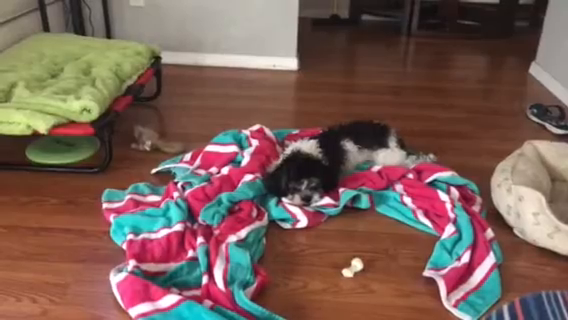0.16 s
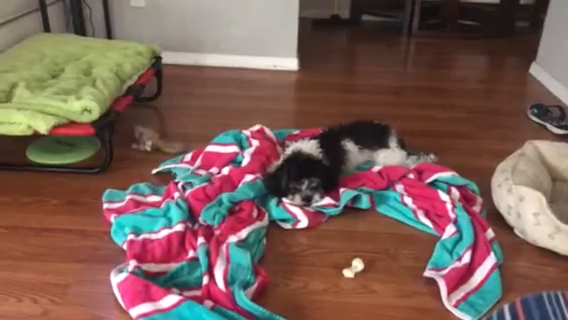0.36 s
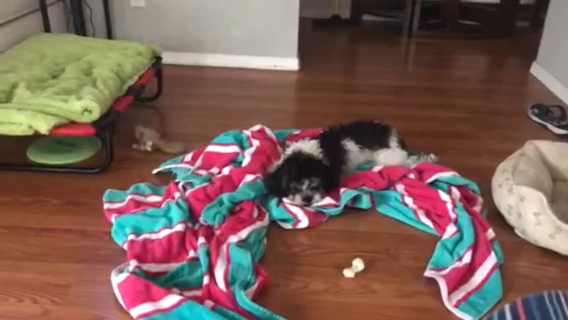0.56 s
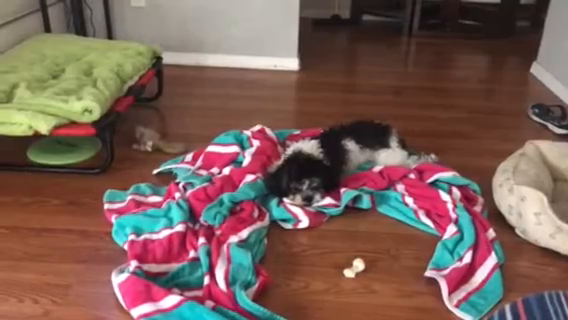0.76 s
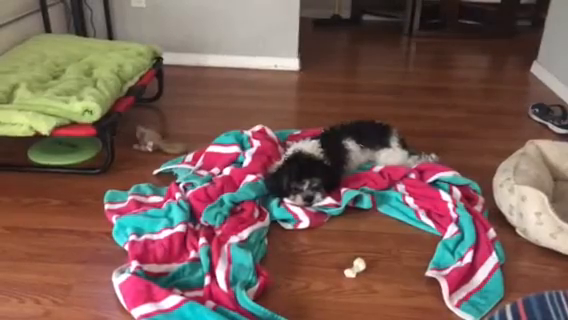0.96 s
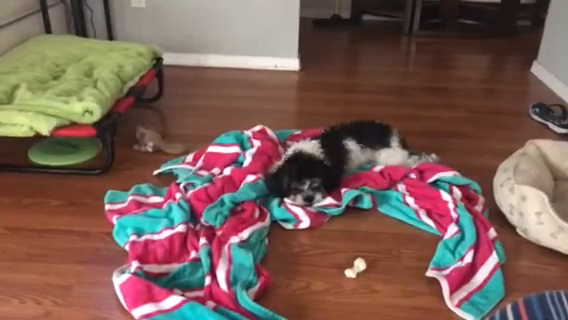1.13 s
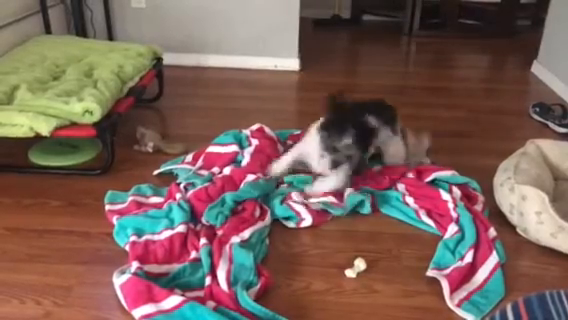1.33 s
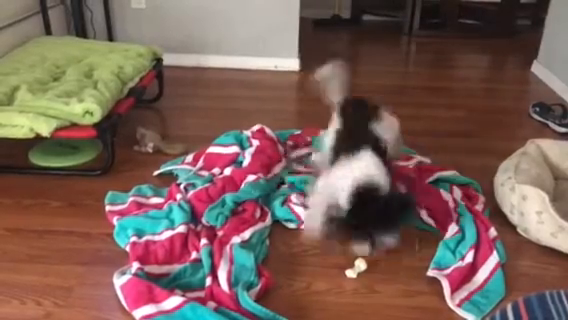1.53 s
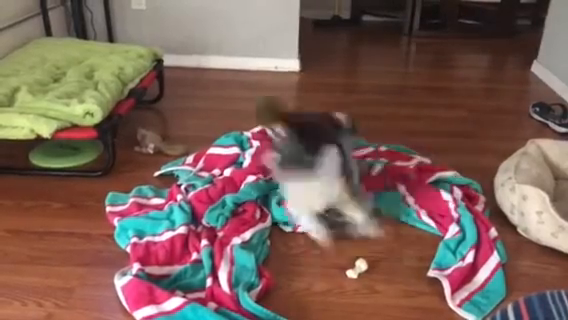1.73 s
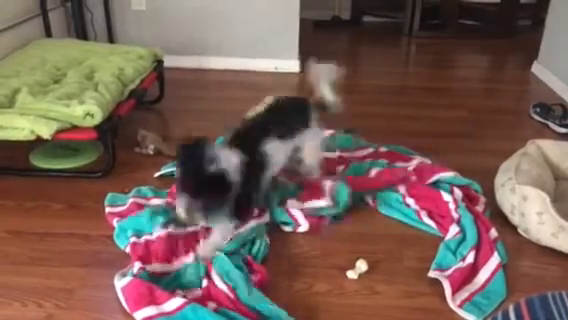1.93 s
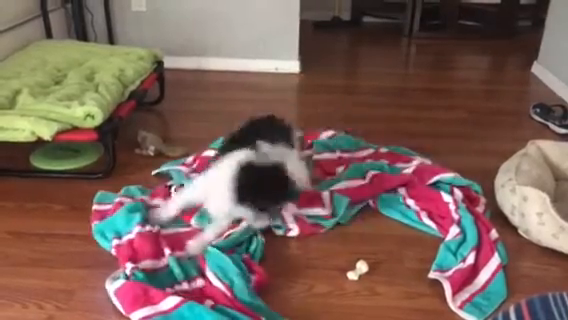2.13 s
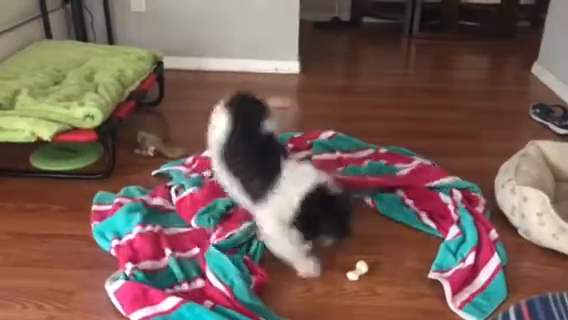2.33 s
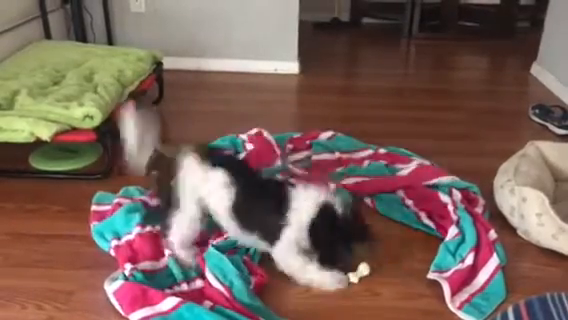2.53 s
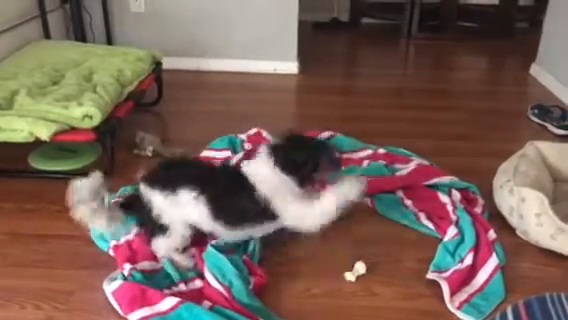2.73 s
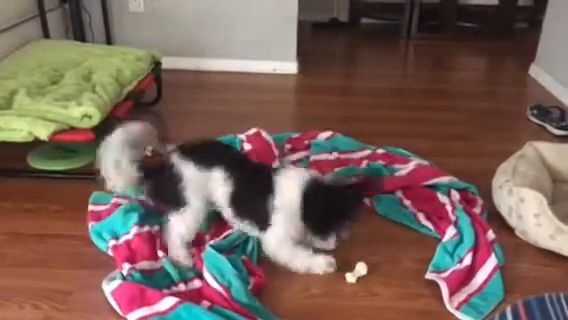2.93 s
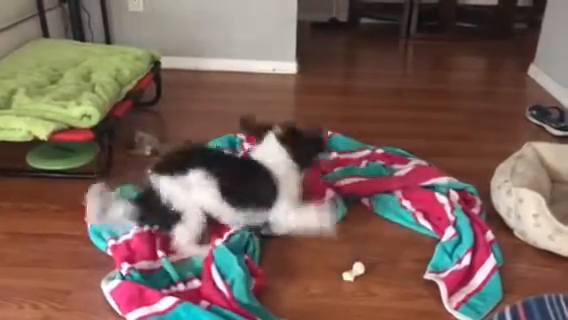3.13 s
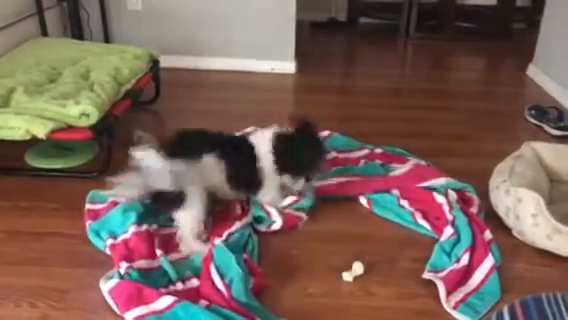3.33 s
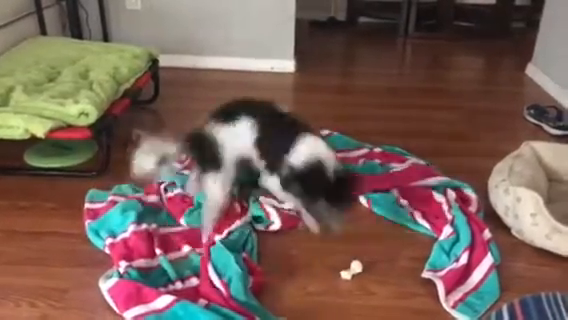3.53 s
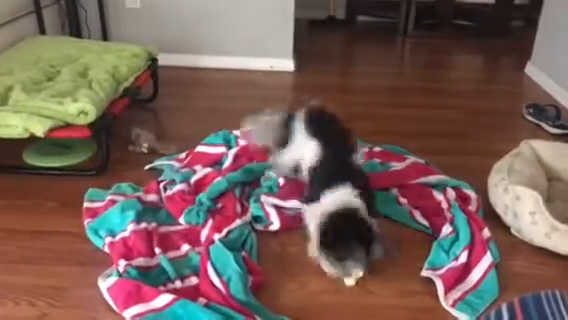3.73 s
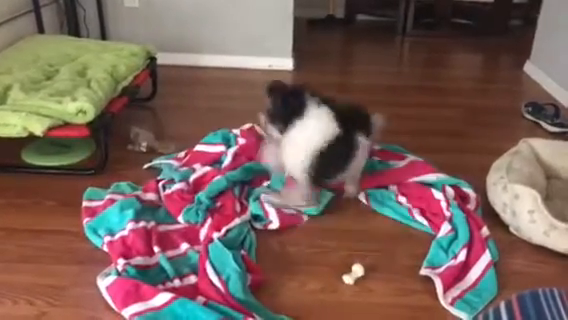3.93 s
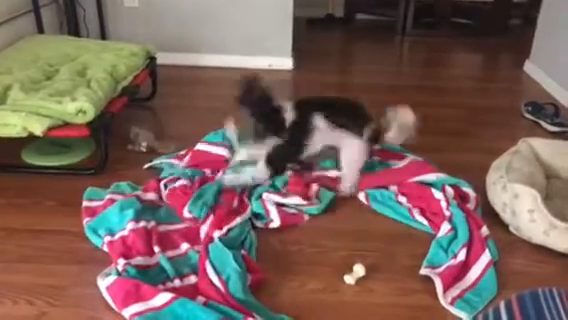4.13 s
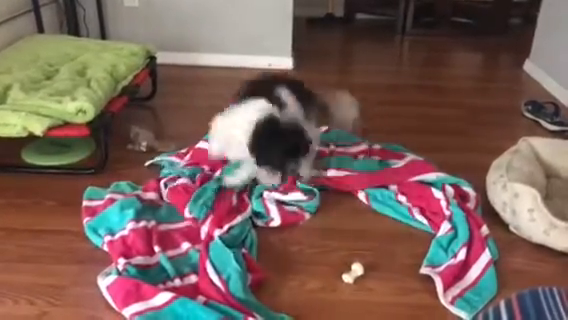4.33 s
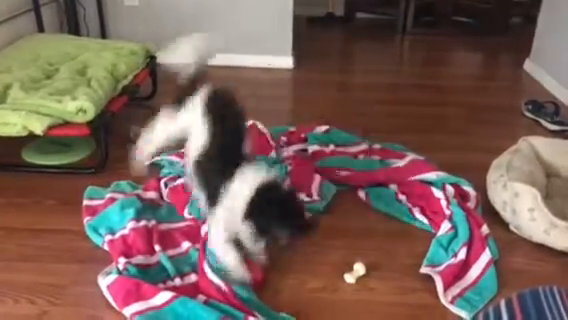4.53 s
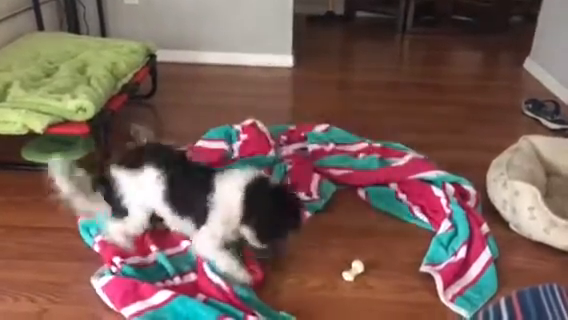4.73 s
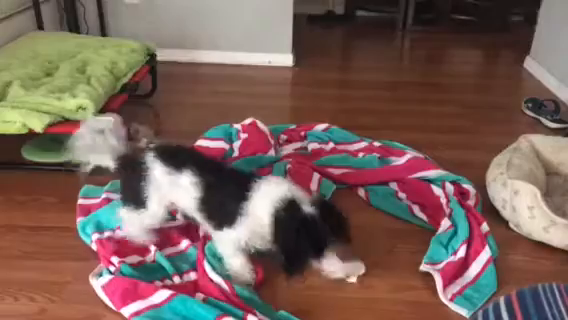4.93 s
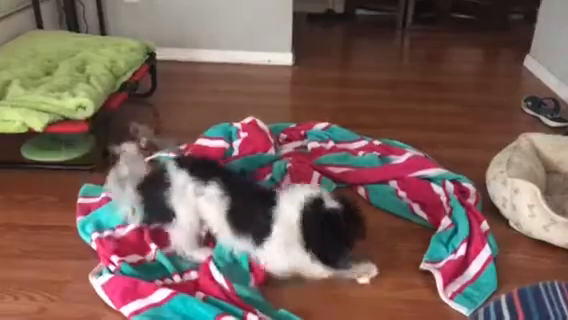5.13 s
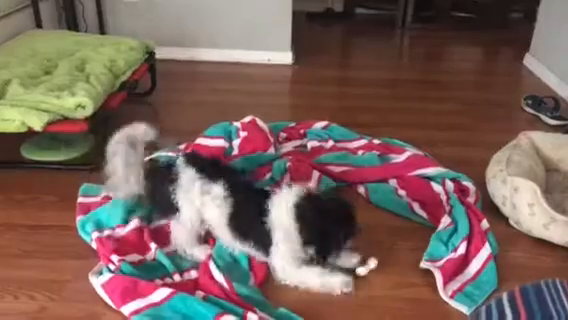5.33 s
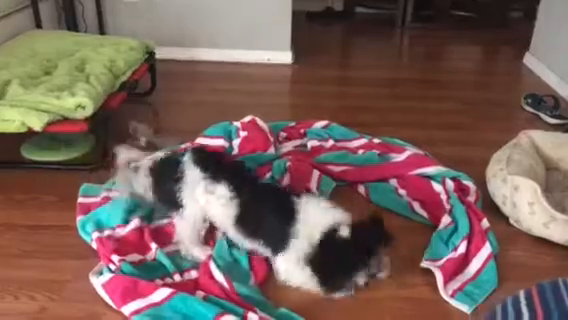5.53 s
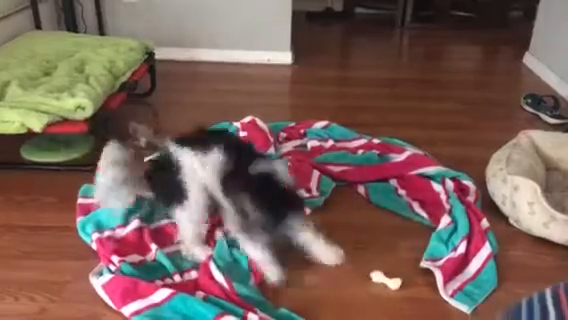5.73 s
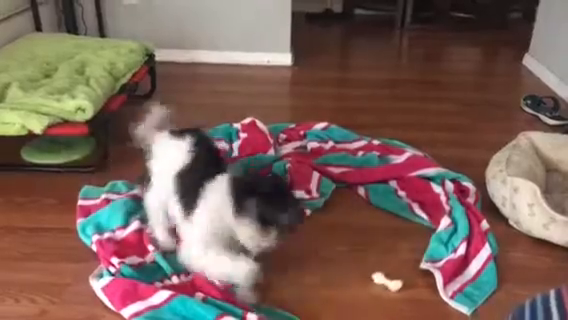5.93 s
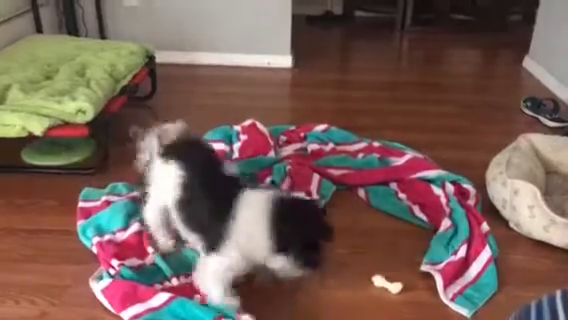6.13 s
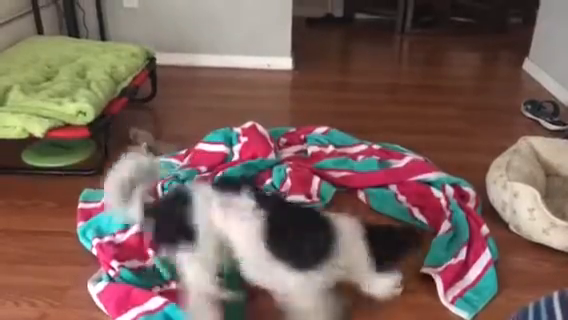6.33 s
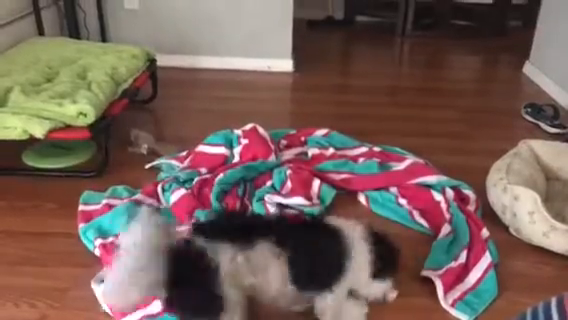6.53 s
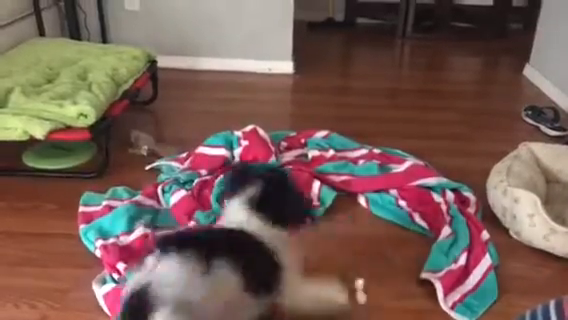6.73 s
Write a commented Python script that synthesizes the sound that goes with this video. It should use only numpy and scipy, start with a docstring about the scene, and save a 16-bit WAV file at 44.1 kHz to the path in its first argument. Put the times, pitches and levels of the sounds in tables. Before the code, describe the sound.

After a quiet start, a brief playful dog growl, then bursts of sharp claw clacks, dull paw knocks and snorts, an engine drone swelling faintly behind.

```python
"""In a room with a wooden floor, a small dog growls once, then a click, snorts and pouncing on a spread towel.
Voice and breath are pulses and noise filtered by resonances, the click a very short burst of the same kind.
Claws are noise cracks, paw blows ring decaying board modes, cloth is grainy noise,
and sparse reflections form the room's brief ring.
Behind lie air hiss, a low hum, room rumble and a drone that swells, as from an engine outdoors."""
import sys
import numpy as np
from scipy import signal
from scipy.fft import rfft, irfft
from scipy.io import wavfile
from scipy.ndimage import uniform_filter1d

SR = 44100
rng = np.random.default_rng(int(sys.argv[2]) if len(sys.argv) > 2 else 0)


def output_pcm(signal):
    """Save a mono or channel-first signal as 16-bit PCM at the path in sys.argv[1].

    Samples are clipped to [-1, 1] before scaling.
    """
    pcm = np.clip(np.atleast_2d(signal).T, -1, 1) * 32767
    wavfile.write(sys.argv[1], SR, np.round(pcm).astype(np.int16))


N = 303408

# air hiss spectrum: pitch_hz, density_db (per Hz, relative)
AIR_SPECTRUM = [(15, -45.5), (25, -16.5), (42, -13.5), (65, -4.5), (87, -23.5), (114, 0.5), (232, -11.5),
                (313, -10), (368, -17), (634, -23), (952, -23), (2900, -36), (15700, -44), (16200, -62)]
# room modes fed by rumble: pitch_hz, width_hz, level_db
RUMBLE_MODES = [(47.5, 8.7, -66), (122.4, 3.4, -74.5), (146, 2.6, -74.5), (183, 4.8, -67.5),
                (226.3, 9.9, -62.5), (361.8, 2.8, -69.5), (430, 30, -73.5)]
# drone course: start_s, pitch_hz, level_db
DRONE_COURSE = [(3.3, 126, -63.5), (3.6, 123, -62.5), (4.19, 122, -59), (4.5, 130.7, -53.5),
                (5.24, 131.3, -54), (5.61, 130.5, -46.5), (5.92, 133.9, -44.5), (6.12, 134.5, -45.5),
                (6.4, 134.5, -39.5), (6.57, 137.5, -47), (6.88, 132.6, -39)]
# growl course: start_s, effort_db, pitch_hz, mouth_db (on the upper resonances),
# shift (factor on their pitch), breath_db (re effort)
GROWL_COURSE = [(1.303, -35, 330.1, -9, 1.13, -36), (1.32, -61, 310.7, -3, 0.81, -24),
                (1.328, -56, 296, 2, 1.7, -19), (1.338, -35.5, 297.6, 3, 0.91, -28),
                (1.375, -37.5, 255.3, 2, 1.05, -22), (1.42, -42.5, 288.1, 2.5, 0.97, -20),
                (1.49, -27, 255.3, -3.5, 1.14, -27), (1.515, -41, 157.1, 3, 1.185, -18.5),
                (1.63, -40.5, 157.5, 2, 0.93, -24), (1.7, -49, 150, 7, 0.94, -21),
                (1.79, -72, 146, -6, 1.4, -23)]
# throat resonances: pitch_hz, width_hz, level_db; the first two stay when the mouth shuts
THROAT_RESONANCES = [(150, 59, 5), (295, 247, -5.5), (587, 235, -8), (973, 140, -7), (1423, 420, -13.5),
                     (1980, 410, -38)]
# nose resonances of the growl's breath: pitch_hz, width_hz, level_db
NOSE_RESONANCES = [(3520, 500, 0), (7470, 1500, 8.5), (8940, 1400, 9), (11000, 1400, 5.5),
                   (13900, 2600, 2.5)]
# decay of the room: pitch_hz, t60_s
ROOM_DECAY = [(300, 0.46), (1000, 0.36), (3000, 0.48), (6000, 0.46), (12000, 0.33)]
# towel and fur rubbing while the dog is on the move: start_s, scuff_db
RUB_COURSE = [(1.6, -58), (1.7, -40.5), (1.85, -64), (2.33, -73), (3.39, -73.5), (3.61, -74.5), (3.76, -64),
              (5.07, -76.5), (5.67, -72), (5.83, -53), (6.0, -71), (6.61, -74), (6.78, -56), (6.88, -61)]
# dull scuff resonances: pitch_hz, width_hz, level_db
SCUFF_RESONANCES = [(1240, 1300, -4.5), (1810, 760, 0), (3950, 1800, -15)]
# fizz spectrum of cloth and of the hiss in click and snorts: pitch_hz, density_db (per Hz, relative)
FIZZ_SPECTRUM = [(710, -35), (1200, -1.5), (2530, -11.5), (4620, -15.5), (11700, -15), (14600, -17.5),
                 (16000, -29), (16500, -24)]
# towel swishes: start_s, level_db, length_s, hum_db (boards under the drag, re level)
SWISH_EVENTS = [(1.703, -55.5, 0.031, 17), (1.894, -63, .12, -37), (2.515, -56.5, 0.048, 3),
                (2.64, -51, 0.12, -24), (3.082, -59.5, 0.24, -2.5), (3.842, -45.5, 0.096, -2.5),
                (5.332, -49.5, 0.031, -24), (5.373, -80, 0.11, 27), (5.648, -67, 0.15, 11.5),
                (5.785, -69, 0.18, 19), (6.209, -51.5, 0.1, -5.5), (6.325, -63, 0.054, -6),
                (6.768, -57.5, 0.052, 16)]
# claw strikes: start_s, level_db, brightest_hz, room_db (sent to the room, re level)
CLAW_STRIKES = [(1.6147, -21, 6500, 7), (1.6772, -20, 6160, 6.5), (1.731, -29, 7140, 5),
                (1.8237, -38.5, 6150, 6.5), (2.4593, -18.5, 6400, 6.5), (2.535, -32, 6060, 11),
                (2.7195, -15.5, 8940, 14), (2.9587, -11.5, 8760, 5.5), (2.9949, -12.5, 6900, 7),
                (3.7271, -18.5, 6630, 7.5), (3.8681, -38, 6880, 15), (3.8894, -27, 6260, 9),
                (4.413, -49, 5540, -0.5), (4.5949, -25, 4950, 8.5), (5.0382, -25, 8100, 11.5),
                (5.0572, -28, 8300, -4), (5.0649, -29, 8800, 12.5), (5.34, -35.5, 8000, 10.5),
                (5.6503, -45.5, 3400, 15), (5.6635, -40.5, 6100, 13), (5.772, -40, 3000, 0),
                (5.7892, -33, 6600, 13.5), (6.224, -44, 6000, 0), (6.336, -28.5, 4570, 9),
                (6.565, -25, 5960, 9), (6.6152, -39, 4570, 7), (6.6812, -43, 3220, 7),
                (6.762, -34.5, 6800, 12), (6.782, -29.5, 8060, -7), (6.831, -21.5, 11000, 14.5)]
# claw crack spectrum: pitch_hz, density_db (per Hz, relative)
CLAW_SPECTRUM = [(470, -26), (800, -8), (1210, -16), (2230, -15.5), (4890, -15.5), (8870, -4.5),
                 (13500, -15.5), (16500, -26)]
# colour of what claws send to the room: pitch_hz, gain_db
CLAW_ROOM_COLOUR = [(590, -28.5), (1000, -11.5), (1930, -2.5), (2800, -5), (4700, 1), (7260, -2),
                    (15200, -8.5), (15900, -15), (16500, -42)]
# paw knocks: start_s, level_db, hardness_db (on the upper modes), depth_db (on the lower modes)
PAW_KNOCKS = [(1.679, -31, -12, -20), (1.75, -36.5, -13, -24), (2.459, -49.5, 19, 4),
              (2.536, -39.5, -21, -7), (2.646, -35, -25, 1), (2.726, -28.5, -15, -25),
              (2.962, -35, -28, -40), (2.998, -36, -17, -3.5), (3.365, -48.5, 4.5, 2.5),
              (3.729, -36, 9, -28), (3.75, -31, -1, -7), (3.87, -27.5, -0.5, -13), (4.596, -41, 11, -0.5),
              (5.042, -25.5, 0.5, -6), (5.282, -40, -2, 2), (5.341, -40.5, -27, -12),
              (5.556, -40.5, -36, -6), (5.654, -40.5, 3, 6.5), (5.665, -23, -1, -26),
              (5.791, -21.5, 2, -18.5), (5.829, -30, 1, -24), (5.882, -31.5, 3, -12), (5.916, -45, -2, -12),
              (5.977, -40.5, 2.5, -2), (6.037, -48, -1.5, -18.5), (6.105, -57, 0.5, -19),
              (6.161, -48, -1, -3), (6.177, -60, 13, -2.5), (6.268, -54, 21.5, -12), (6.338, -40, 4.5, -4),
              (6.569, -35, -4, -18), (6.619, -33.5, 9, -22), (6.659, -30.5, -31, -12),
              (6.733, -29.5, -32, -16), (6.763, -23, 4, -28), (6.782, -36, 19, -14), (6.826, -33, -11, -14)]
# floorboard modes: pitch_hz, level_db, t60_s
BOARD_MODES = [(358, 9, 0.032), (452, 3, 0.056), (580, -10.5, 0.13), (626.2, 3.5, 0.058), (681, 7.5, 0.044),
               (742, 13, 0.015), (881, 6, 0.022), (1367, 10, 0.0088), (1620, 17, 0.0045), (2126, -3, 0.012)]
# a short click at 1.975 s, then the snorts:
# start_s, level_db, length_s, size (factor on the resonance pitches), hiss_db (re level), rise_s
CLICK_AND_SNORT_EVENTS = [(1.975, -50.5, 0.016, 0.83, -14, 0.0012), (2.085, -58, 0.044, 0.92, -1.5, 0.0088),
                          (2.135, -47, 0.045, 0.9, -16, 0.009), (3.554, -51.5, 0.039, 0.95, -19, 0.003),
                          (3.648, -58, 0.024, 1.05, -13, .003), (4.294, -43, 0.059, 0.83, -8.5, 0.039),
                          (4.406, -55.5, 0.021, 0.99, -25.5, .002), (4.688, -55, 0.057, 0.83, -8, 0.0036)]
# resonances of the snorts, also used for the click: pitch_hz, width_hz, level_db
SNOUT_RESONANCES = [(764, 420, 10), (2115, 500, 13.5), (3740, 640, 2), (4400, 1800, -6),
                    (6740, 2200, -10.5), (11000, 720, -14), (14200, 450, -14)]

AIR_DB = -62
HUM_HZ, HUM_DB = 70.05, -58.5  # centre of a slightly wandering low hum
DRONE_THROB_DB, DRONE_THROB_SWAY_DB = -60, 3.5  # a wavering throb under the drone
ROUGH = 0.33  # share of rasp in the lower voice
# the growl throbs near its start, then steadies
THROB_HZ, THROB_DB, THROB_SPREAD_S = 32.2, 7.5, 0.084
NOSE_DRIFT = 0.045  # typical share by which the nose bands wander
NOSE_SAG, NOSE_SAG_S = 0.17, 0.06  # the lowest nose band sinks by this share, in this time
WHISTLE_S, WHISTLE_SPREAD_S, WHISTLE_DB = 1.375, 0.028, 19  # and flares up once
RUB_FIZZ_DB = -7.5  # fizz of the rubbing re scuff
SWISH_RISE = 0.34  # rise time constant of a swish as a share of its length
SWISH_HZ, SWISH_WANDER = 4260, 0.07  # a band in the fizz, and its typical wander as a share
SKIMS_PER_S, SKIM_HZ, SKIM_DB, SKIM_SPREAD_DB = 23, 8800, -61.5, 0.5
EDGE_HZ = 16300  # upper band limit


def amp(db):
    """Decibel law: level to amplitude ratio."""
    return 10 ** (np.asarray(db) / 20)


def evened(x):
    """Normalisation to unit root-mean-square."""
    return x / np.sqrt(np.mean(x ** 2) + 1e-20)


def read(points, hz):
    """Interpolation along a logarithmic frequency axis."""
    f, value = np.transpose(points)
    return np.interp(np.log(hz + 1), np.log(f + 1), value)


def played(rows):
    """Linear interpolation in time: a gate open over the table's span, and each column as a curve."""
    s, *columns = np.transpose(rows)
    t = np.arange(N) / SR
    gate = uniform_filter1d(1. * (t > s[0]) * (t <= s[-1]), size=300)
    return gate, *(np.interp(t, s, c) for c in columns)


def resonate(x, hz, width):
    """Resonance by heterodyning: shift a fixed or moving centre to zero, smooth, shift back."""
    turn = np.exp(2j * np.pi * np.cumsum(hz * np.ones(len(x))) / SR)
    r = np.exp(-np.pi * width / SR)
    return 2 * (turn * signal.lfilter([1 - r], [1, -r], x / turn)).real


def through(x, peaks):
    """Parallel resonances, each passed twice for steep sides, with alternating signs."""
    total = 0
    for k, (hz, width, db) in enumerate(peaks):
        steep = resonate(resonate(x, hz, width), hz, width)
        total = total + (-1) ** k * amp(db) * steep
    return total


def coloured(x, points):
    """Linear filtering: multiply the spectrum by a gain curve."""
    hz = np.fft.rfftfreq(len(x), 1 / SR)
    return irfft(rfft(x) * amp(read(points, hz)), len(x))


def slow(hz):
    """Low-passed noise: random drift up to about hz, of unit root-mean-square."""
    return evened(signal.lfilter(*signal.butter(2, hz, fs=SR), rng.standard_normal(N)))


def puff(length_s, rise_s):
    """Transient envelope: an exponential approach times a slower Gaussian fall."""
    t = np.arange(round(4 * length_s * SR)) / SR
    return (1 - np.exp(-t / rise_s)) * np.exp(-(t / length_s) ** 2)


def add(mix, s, sound):
    """Superposition: add a sound to the mix from time s, in place."""
    part = mix[round(s * SR):][:len(sound)]
    part += sound[:len(part)]


def background():
    """Broadband and modal noise with tones: air hiss, a hum, rumbling room modes and the swelling drone."""
    out = amp(AIR_DB) * evened(coloured(rng.standard_normal(N), AIR_SPECTRUM))
    hum_turns = np.cumsum(HUM_HZ + 1.9 * slow(4.)) / SR
    out = out + amp(HUM_DB) * np.sqrt(2) * np.sin(2 * np.pi * hum_turns)
    for hz, width, db in RUMBLE_MODES:
        out = out + amp(db) * evened(resonate(rng.standard_normal(N), hz, width))
    gate, hz, tone_db = played(DRONE_COURSE)
    tone = np.sqrt(2) * np.sin(2 * np.pi * np.cumsum(hz) / SR) * amp(tone_db + 0.84 * slow(5.3))
    throb = evened(through(rng.standard_normal(N), [(53.0, 15, 0.13), (78.0, 37.0, -1.6)]))
    throb_level = amp(DRONE_THROB_DB + DRONE_THROB_SWAY_DB * slow(1.6))
    return out + uniform_filter1d(gate, size=9000) * (tone + throb_level * throb)


def growl():
    """Source and filter: uneven pulses and puffs through the throat, breath hissing through the nose."""
    gate, effort_db, hz, mouth_db, shift, breath_db = played(GROWL_COURSE)
    t = np.arange(N) / SR
    jitter = np.where(hz < 200, .05, .11) * slow(60.)
    turns = np.cumsum(hz * (1 + jitter)) / SR
    folds = sum(np.cos(2 * np.pi * k * turns) for k in range(1, 12)) * amp(3.1 * slow(64.0))
    gust = 0.16 + np.exp(-(turns % 1) / 0.28)  # one puff of air per pulse
    # at low pitch strong and weak pulses alternate
    folds = evened(folds * (1 + .4 * (hz < 200) * np.cos(np.pi * turns)))
    rasp = evened(gust * rng.standard_normal(N))
    low = through((1 - ROUGH) * folds + ROUGH * rasp, THROAT_RESONANCES[:2])
    # higher up the rasp outweighs the pulses
    upper = [(f * shift, w, g) for f, w, g in THROAT_RESONANCES[2:]]
    voice = low + amp(mouth_db) * through((1 - ROUGH) ** 2 * folds + rasp, upper)

    air = gust * rng.standard_normal(N)
    away = abs(t - GROWL_COURSE[3][0])  # seconds either side of the height of the throb
    lowest_hz, *lowest_rest = NOSE_RESONANCES[0]
    sinking = (lowest_hz * (1 - NOSE_SAG * np.minimum(away / NOSE_SAG_S, 1)), *lowest_rest)
    bands = []
    for f, w, g in [sinking, *NOSE_RESONANCES[1:]]:
        sway = amp(3.5 * slow(30.))  # each band of the hiss comes and goes
        bands.append(sway * through(air, [(f * (1 + NOSE_DRIFT * slow(19.0)), w, g)]))
    whistle = amp(WHISTLE_DB * np.exp(-((t - WHISTLE_S) / WHISTLE_SPREAD_S) ** 2))
    breath = evened(whistle * bands[0] + sum(bands[1:]))
    throb_db = THROB_DB * np.exp(-(away / THROB_SPREAD_S) ** 2) * np.cos(2 * np.pi * THROB_HZ * away)
    return gate * amp(effort_db + throb_db) * (evened(voice) + amp(breath_db) * breath)


def room(x):
    """Reverberation by convolution: sparse reflections of random sign, each band dying at its own speed."""
    taps = np.zeros(SR)
    at = np.arange(200, SR - 20, 12)
    at = at + rng.integers(0, 12, len(at))
    taps[at] = rng.choice([-1., 1.], len(at)) * amp(1.4 * slow(45.)[at])
    hz, t, z = signal.stft(taps, SR, nperseg=256)
    decay = amp(-60 * t / read(ROOM_DECAY, hz)[:, None])
    tail = signal.istft(z * decay, SR, nperseg=256)[1]
    return signal.fftconvolve(x, tail / np.linalg.norm(tail))[:N]


def towel():
    """Stick-slip friction: fibres slip in uneven grains, a dull scuff and swishes that set boards humming."""
    gate, scuff_db = played(RUB_COURSE)
    flutter_db = np.array([2.5 * slow(40.) for layer in range(3)])
    # the fast flutter is shared by scuff, fizz and boards
    grains = rng.standard_normal((3, N)) * amp(flutter_db + 2.0 * slow(900.))
    drag, press = np.zeros(N), np.zeros(N)
    for s, db, length_s, hum_db in SWISH_EVENTS:
        add(drag, s, amp(db) * puff(length_s, SWISH_RISE * length_s))
        add(press, s, amp(db + hum_db) * puff(length_s, 0.0026))
    jolts = grains[2] * amp(3 * slow(60.))
    # a mode's width is about 2.3 / t60
    hum = evened(sum(amp(db) * resonate(jolts, hz, 2.3 / t60) for hz, db, t60 in BOARD_MODES[3:7]))
    fizz = evened(coloured(grains[1], FIZZ_SPECTRUM))
    band_hz = SWISH_HZ * np.exp(SWISH_WANDER * slow(4.))
    fizz = evened(fizz + 2.5 * resonate(fizz, band_hz, 600))
    scuff = gate * amp(scuff_db) * evened(through(grains[0], SCUFF_RESONANCES))
    return scuff + (drag + gate * amp(scuff_db + RUB_FIZZ_DB)) * fizz + press * hum


def skims():
    """Poisson impulses: faint single claw ticks skim the floor at random moments during the rubbing."""
    size = amp(SKIM_DB + SKIM_SPREAD_DB * np.minimum(rng.exponential(1, N), 2))
    size = size * (rng.random(N) < SKIMS_PER_S / SR)
    crack = rng.standard_normal(256) * amp(-60 * np.arange(256) / SR / .004)
    tick = through(crack, [(SKIM_HZ, 3000, 0)])
    return signal.oaconvolve(played(RUB_COURSE)[0] * size, tick / abs(tick).max())[:N]


def claws():
    """Impact noise: three claws crack in quick turn; returns the cracks and what they send to the room."""
    dry, sent = np.zeros(N), np.zeros(N)
    t = np.arange(512) / SR
    grit = rng.standard_normal((len(CLAW_STRIKES), 3, 512))
    chance = rng.random((len(CLAW_STRIKES), 3, 2))
    for (s, db, hz, room_db), noise, luck in zip(CLAW_STRIKES, grit, chance):
        bright_hz = min(hz, 15000)
        for k in range(3):
            crack = np.roll(noise[k] * amp(-60 * t / .0035), 64)
            tick = evened(coloured(crack, CLAW_SPECTRUM)) + 1.2 * evened(resonate(crack, bright_hz, 1700))
            at = s + k * (.0012 + .0011 * luck[k, 0])
            claw_db = db + 2 - k * (2 + 5 * luck[k, 1])  # later claws are weaker
            add(dry, at, amp(claw_db) * tick / abs(tick).max())
        blow = 1. * (t == 0)
        # 64 samples match the lead-in of the crack
        add(sent, s + 64 / SR, amp(db + room_db) * (blow + 1.1 * resonate(blow, bright_hz, 1500)))
    return dry, coloured(sent, CLAW_ROOM_COLOUR)


def knocks():
    """Modal synthesis: a paw blow rings decaying board modes, whose balance varies a little by place."""
    out = np.zeros(N + 8000)
    t = np.arange(8000) / SR
    hz, mode_db, t60 = np.transpose(BOARD_MODES)[:, :, None]
    place = rng.standard_normal((len(PAW_KNOCKS), len(BOARD_MODES), 1))
    for (s, db, hard_db, deep_db), chance in zip(PAW_KNOCKS, place):
        level_db = mode_db + 2.5 * chance + hard_db * (hz > 1100) + deep_db * (hz < 480)
        ring = (amp(level_db - 60 * t / t60) * np.sin(2 * np.pi * hz * t)).sum(axis=0)
        soft_onset = 1 - np.exp(-t / 0.0046)
        add(out, s, amp(db - 2.0) * ring * soft_onset)
    return out[:N]


def click_and_snorts():
    """Filtered noise bursts: at 1.975 s a short click, then snorts, gusts of air through the nose."""
    out = np.zeros(N)
    noise = rng.standard_normal((len(CLICK_AND_SNORT_EVENTS), 2, SR // 2))
    for (s, db, length_s, size, hiss_db, rise_s), (a, b) in zip(CLICK_AND_SNORT_EVENTS, noise):
        shape = puff(length_s, rise_s)
        burst = evened(through(a, [(hz * size, w, g) for hz, w, g in SNOUT_RESONANCES]))
        burst = burst + amp(hiss_db) * evened(coloured(b, FIZZ_SPECTRUM))
        # skip the build-up of the resonances
        add(out, s, amp(db) * shape * burst[2000:][:len(shape)])
    return out


def scene():
    """Superposition of direct sounds, their reverberation and the background."""
    voice = growl()
    cloth = towel() + skims()
    ticks, sent = claws()
    paws = knocks()
    bursts = click_and_snorts()
    wet = room(sent + amp(-4.5) * paws + amp(-2.5) * voice + amp(-5.5) * bursts + amp(-10.0) * cloth)
    return (ticks + paws + voice + bursts + cloth + wet + background())[None]


def record(dry):
    """Band limiting: the microphone drops the deepest bass, then a low-pass cuts the top."""
    thin = signal.sosfilt(signal.butter(3, 36, "high", fs=SR, output="sos"), dry)
    low_pass = signal.firwin(511, EDGE_HZ, window=("kaiser", 9), fs=SR)
    return signal.oaconvolve(thin, low_pass[None], "same")


dry = scene()
out = record(dry)
output_pcm(out)
```